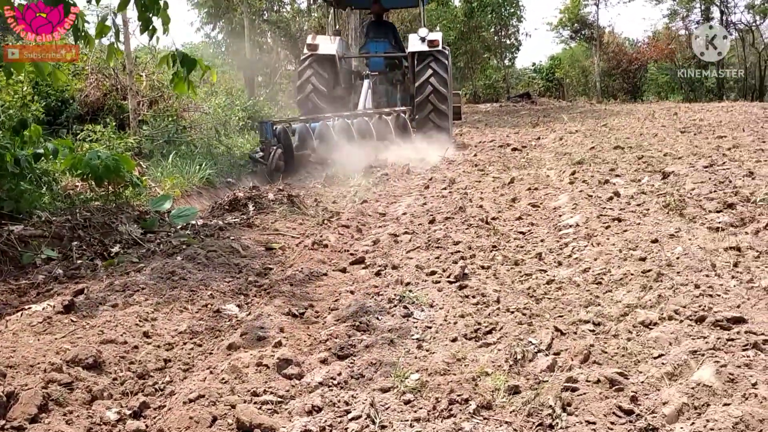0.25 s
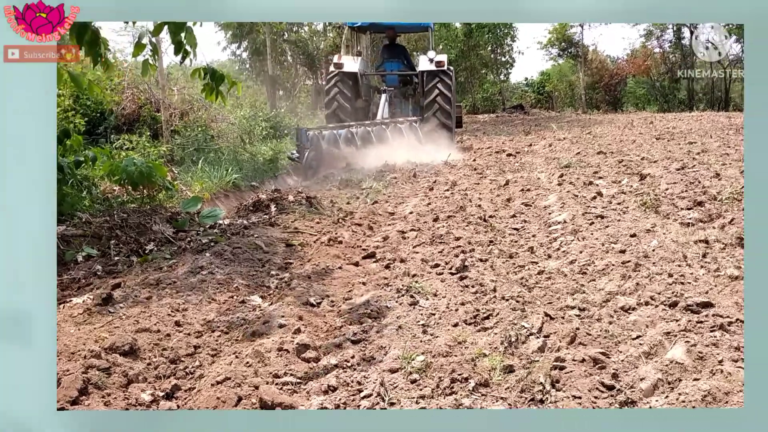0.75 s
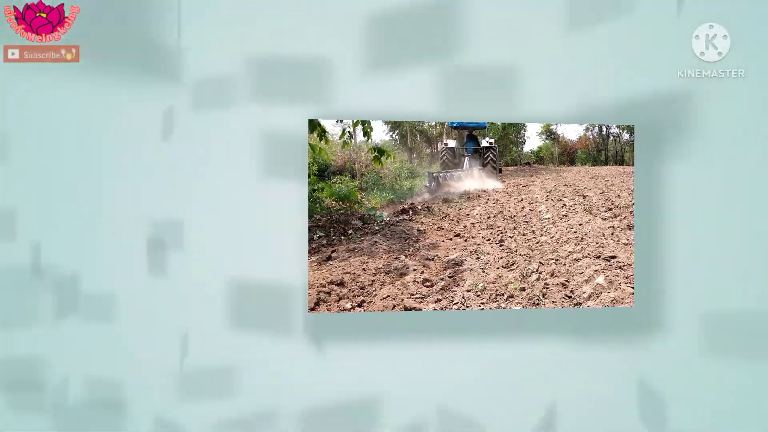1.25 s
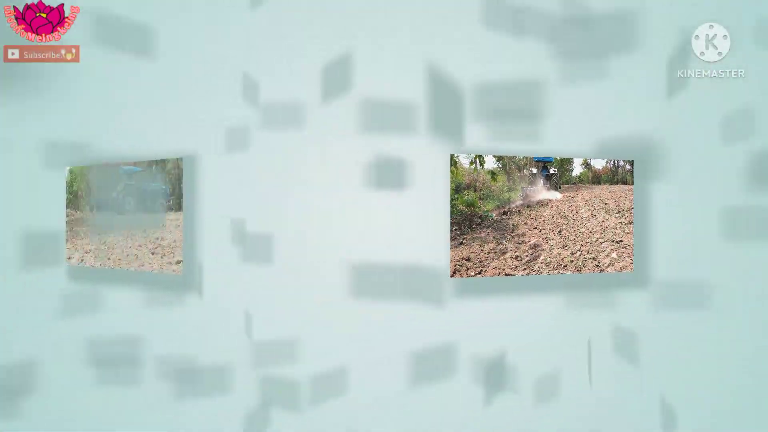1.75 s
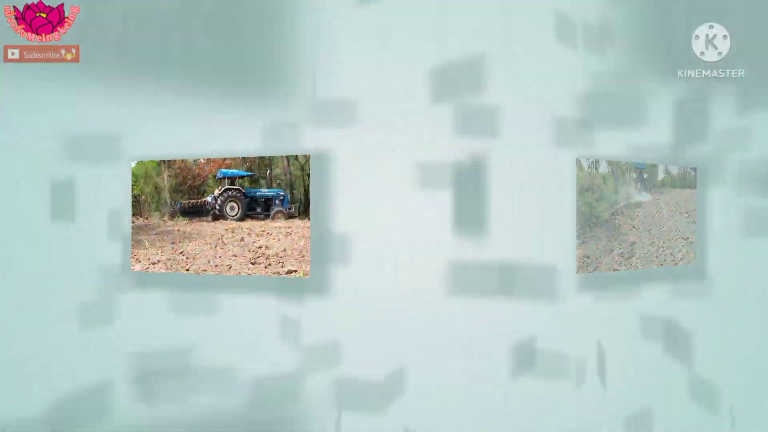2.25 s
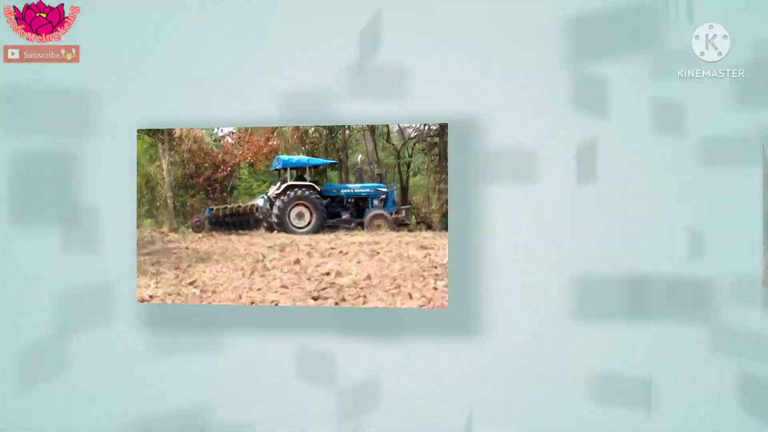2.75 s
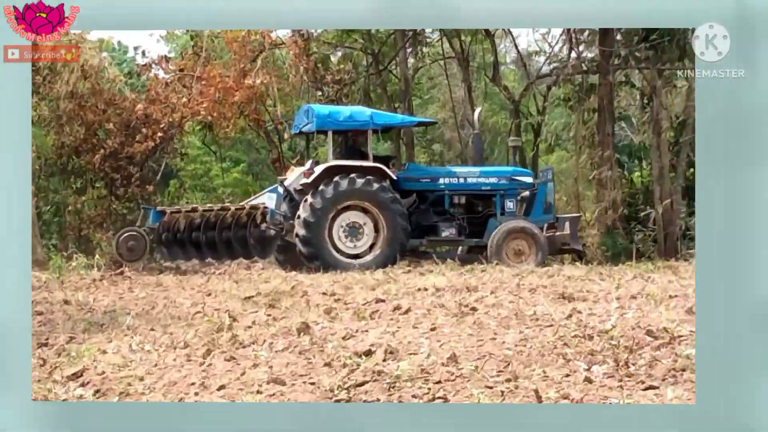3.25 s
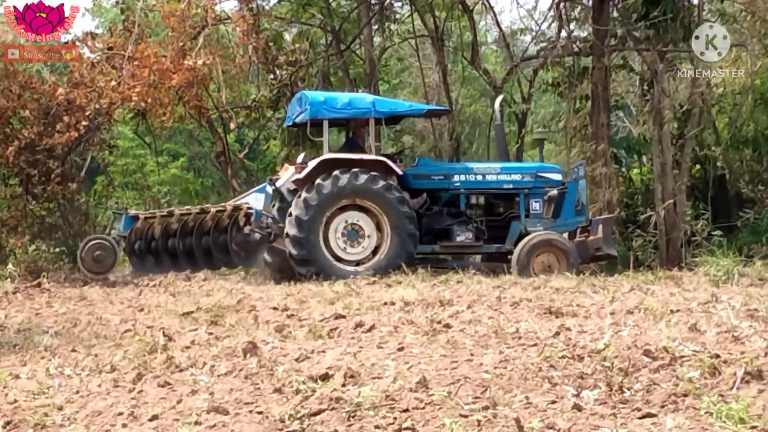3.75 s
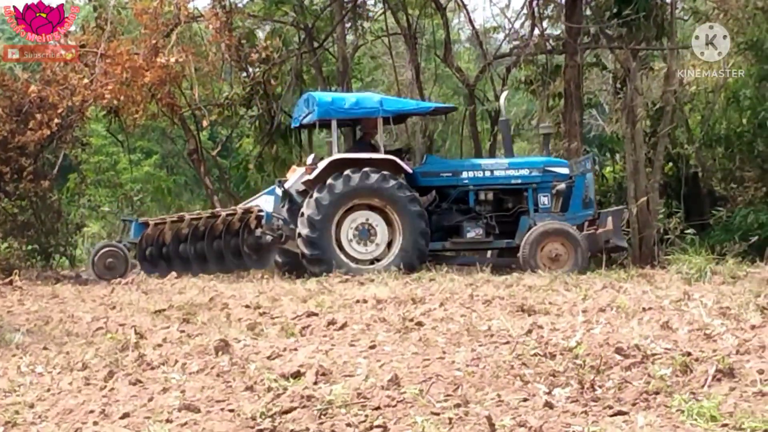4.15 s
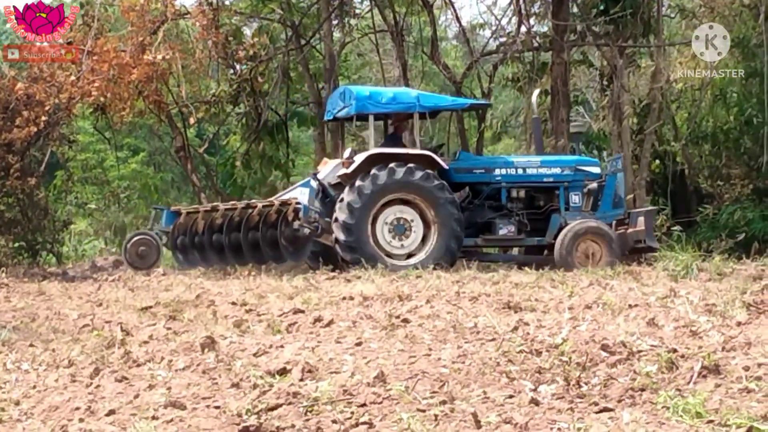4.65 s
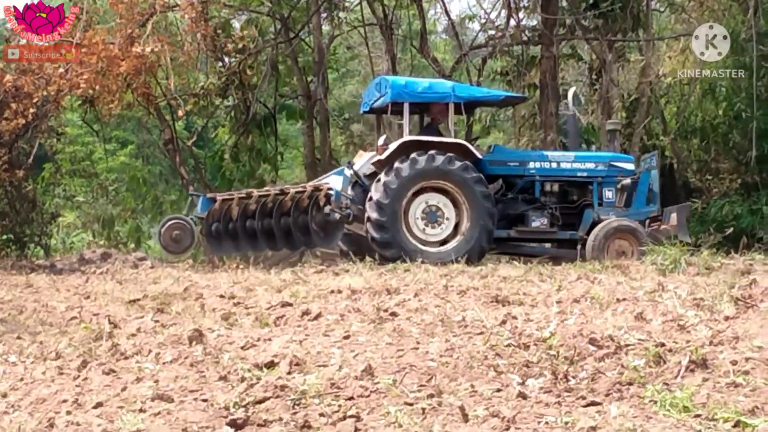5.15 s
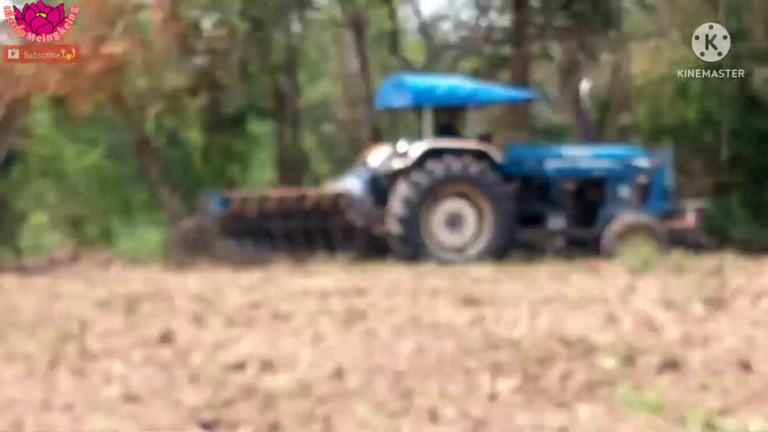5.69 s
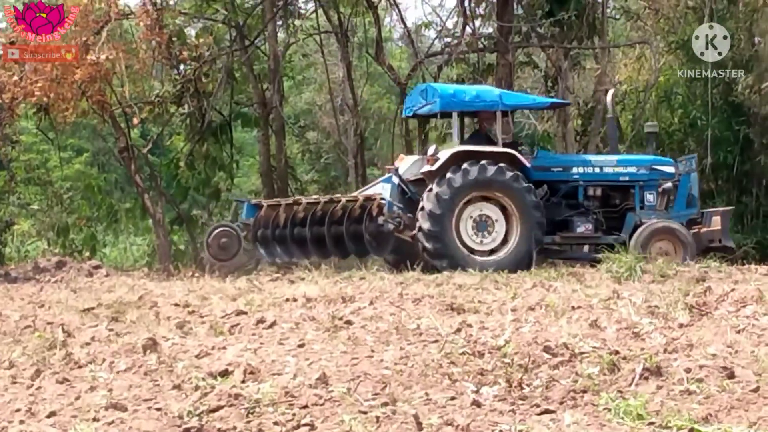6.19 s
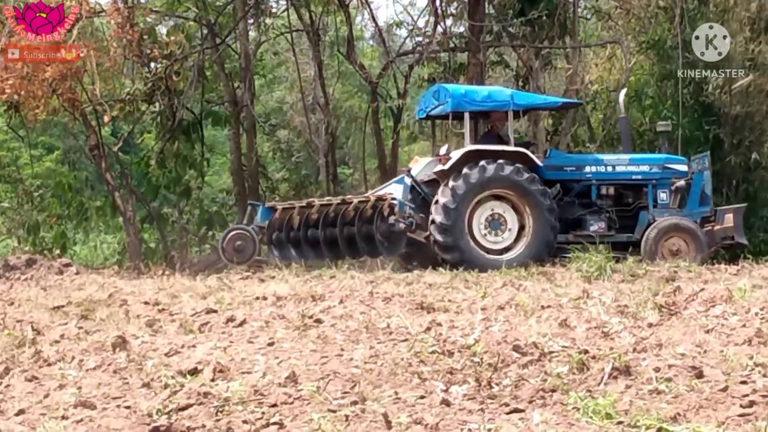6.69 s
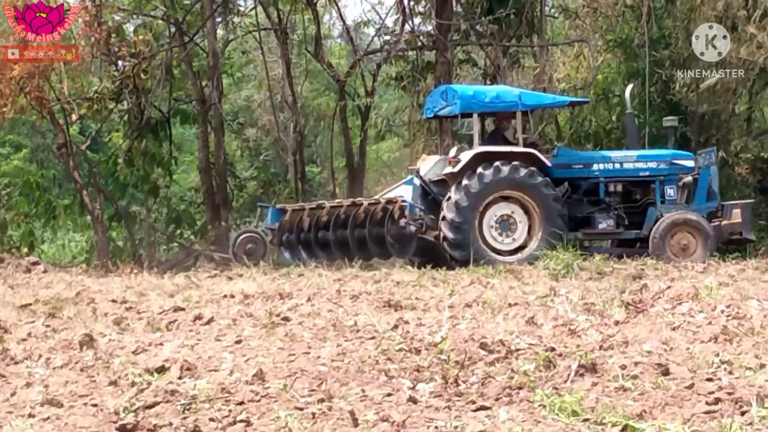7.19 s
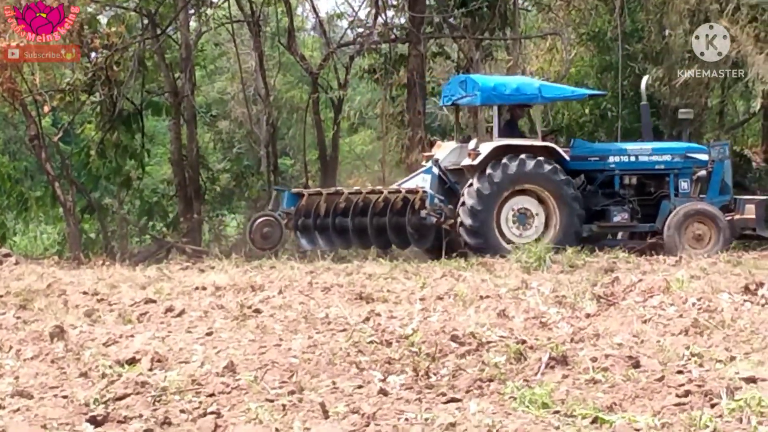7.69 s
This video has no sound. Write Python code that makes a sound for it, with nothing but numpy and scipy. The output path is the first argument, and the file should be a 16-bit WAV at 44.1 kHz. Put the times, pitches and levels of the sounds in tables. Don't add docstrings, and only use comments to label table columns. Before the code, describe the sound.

Outdoors in a field, a diesel tractor drones fast and loud near the microphone, soil hissing and stones cracking against ringing steel discs. Over about three seconds it recedes and cross-fades into a much quieter, farther pass, with slower uneven firing, ticking valves and small metal clanks. Near the end, soft wind gusts and low slaps press on the microphone.

```python
import sys
import numpy as np
from scipy import signal
from scipy.fft import rfft, irfft, next_fast_len
from scipy.io import wavfile

SR = 44100
rng = np.random.default_rng(int(sys.argv[2]) if len(sys.argv) > 2 else 0)


def wrap_up_sound(samples):
    columns = np.atleast_2d(samples).T
    tamed = np.clip(columns, -1, 1)
    steps = np.round(tamed * 32767).astype(np.int16)
    wavfile.write(sys.argv[1], SR, steps)


def decibels_to_gain(level_db):
    exponent = np.asarray(level_db, float) / 20
    return 10 ** exponent


N = 349713

# t/s, length/s, level/dB
GUSTS = [
    (4.85, .2, -56),
    (7.15, .35, -53),
    (7.5, .6, -53),
]
# t/s, peak level/dB, f/Hz
THUMPS = [
    (7.258, -43.5, 30),
    (7.325, -32, 38),
    (7.428, -42, 34),
    (7.634, -31, 41.6),
    (7.745, -42, 48),
    (7.81, -42, 36),
    (7.888, -33, 45),
]
# t/s, level/dB
NEAR_FADE_DB = [
    (0, 1),
    (.55, 0),
    (1.0, -1.5),
    (1.5, -4.5),
    (2.0, -9.5),
    (2.35, -12),
    (2.75, -17.5),
    (3.05, -22.5),
    (3.4, -29.5),
]
# t/s, f/Hz
NEAR_FIRING_HZ = [(0.0, 45.24), (0.4, 45.15), (0.95, 44.15), (1.5, 44.48), (2.0, 44.76), (2.4, 44.36),
                  (2.75, 43.77), (3.0, 43.64)]
FAR_FIRING_HZ = [(1.7, 29.46), (2.62, 32.16), (2.9, 31.62), (3.15, 28.61), (3.56, 28.23), (3.84, 29.16),
                 (4.15, 28.61), (4.46, 31.3), (4.73, 28.31), (4.96, 29.48), (5.19, 27.37), (5.55, 29.75),
                 (5.77, 28.5), (6.11, 29.73), (6.43, 27.53), (7.0, 29.09), (7.24, 29.11), (7.93, 26.95)]
# t/s, level/dB
LOAD_DB = [(2.55, 5), (2.68, -6), (2.92, -1.5), (3.03, -2), (3.4, -2), (3.8, -0.5), (4.11, -3.5), (4.5, -1),
           (4.93, 0), (5.16, -8.5), (5.29, 0), (5.6, 0), (6.0, -1.5), (6.49, -3.5), (6.78, -2),
           (7.09, -3.5), (7.42, -1), (7.62, -1), (7.93, 3)]
# t/s, level/dB
HARSH_DB = [(3.0, -0.5), (3.35, -3.5), (3.7, -1.5), (4.1, -2.5), (4.6, 1.5), (4.95, 3.5), (5.25, 0.5),
            (5.5, 3), (5.7, 3.5), (6.05, 2.5), (6.45, -1.5), (7.1, -1.5), (7.55, 1), (7.93, 2)]
# t/s, level/dB
DRONE_TURN_DB = [
    (3.0, 2.5),
    (4.2, 0.5),
    (5.4, 2.5),
    (5.7, -4),
    (6.2, 2),
    (7.0, 0),
    (7.6, -1),
    (7.93, 1),
]
# t/s, level/dB
SIDE_PANEL_DB = [
    (6.3, -81),
    (6.7, -61.5),
    (7.0, -58),
    (7.5, -64),
    (7.93, -60),
]
# multiple of firing rate, level/dB
NEAR_ORDERS = [(.75, -26), (1, -5), (1.25, -19), (1.75, -28), (2, -9), (2.25, -19), (2.5, -30), (2.75, -29),
               (3, -31), (3.25, -26), (3.5, -26), (3.75, -30), (4, -18), (5, -29), (6, -31), (7, -32),
               (9, -31)]
FAR_ORDERS = [(.25, -27), (1, -14), (1.5, -19), (1.75, -26), (2, -5), (2.25, -25), (2.5, -27), (3, -7),
              (3.25, -29), (4, -15), (5, -27)]
# f/Hz, density level/dB
NEAR_NOISE = [(82, -25), (140, 10.5), (181, 2.5), (360, -11.5), (555, -6), (662, -10.5), (907, -1),
              (1150, -5.5), (1990, -2.5), (2890, -4.5), (3660, -14), (5990, -20.5), (15400, -20.5)]
FAR_NOISE = [(88, 3), (150, 4.5), (263, -6.5), (480, -11.5), (529, -4.5), (721, -7), (1020, -0.5),
             (1390, -5), (1720, -8.5), (2440, -4.5), (5000, -14.5), (7820, -15.5), (15400, -17)]
# f/Hz, width/Hz, boost level/dB
NEAR_BODY = [(155, 70, -9), (401, 30, 4), (560, 60, 4), (813, 25, 4), (926, 25, 7), (1039, 70, 3),
             (1221, 25, 4), (1464, 50, 4), (1804, 35, 4), (1983, 130, 3), (2550, 150, 2), (2885, 50, 3),
             (3240, 50, 5), (3983, 40, 3), (4320, 190, 2), (4690, 80, 3), (8410, 600, 3), (15300, 1500, 4)]
FAR_BODY = [(222, 65, -10), (540, 64, 0.5), (1060, 54, 3.5), (1410, 26, 9.5), (2190, 410, 4),
            (4650, 450, 7.5), (8150, 2400, 10), (15000, 1500, 4.5)]
# f/Hz, share/0-1
NEAR_BEAT = [(300, 0.05), (560, 0.23), (950, 0.35), (2000, 0), (4000, 0.09), (15000, 0)]
FAR_BEAT = [(300, .03), (600, .06), (1000, .26), (2500, .4), (6000, .27), (15000, .3)]
NEAR_CYLINDER_DB = [-4.5, -3, -2, -1]
FAR_CYLINDER_DB = [2.7, 3.2, 2.5, 1.1]
# f/Hz, level/dB, t60/s
NEAR_BLOCK = [(594, -12.5, 0.047), (815, -12, 0.18), (927, 2.5, 0.096), (984, 6.5, 0.089),
              (1104, -17, 0.11), (1495, -2, 0.27), (1830, -2, 0.051), (2050, -5, 0.12), (2496, -24, 0.061),
              (2940, 2, 0.019), (3380, -16, 0.04)]
FAR_BLOCK = [(1014, -5, 0.18), (1082, -4, 0.29), (1335, -11, 0.068), (1517, -3, 0.12), (1973, 6.5, 0.073),
             (2160, 3, 0.088), (2377, 5, 0.072), (2520, -4, 0.076), (3070, 2, 0.093), (3270, -1, 0.06),
             (4660, -25, .04), (5600, -3, .03), (7930, -24, .035), (8440, -25, 0.031), (9930, -9, .03),
             (11400, -22, .03)]
NEAR_DB = [-32, -41.5, -35.5, -41.5]
FAR_DB = [-42.5, -65.5, -54, -65]
NEAR_FOLLOWS_FADE = [0.98, 0.99, 0.95, 0.95]
FOLLOWS_LOAD = [.99, 0.12, 0.16, 0.044]
FOLLOWS_HARSH = [.01, .2, .4, .7]
# t/s, peak level/dB, loudest ring f/Hz, brightness level/dB
STONES = [(0.12, -18, 1770, -23), (0.3398, -26, 1740, -11), (0.6055, -21, 2030, -14),
          (0.674, -26, 2860, -18), (0.722, -23, 2820, -8.5), (0.732, -22.5, 2270, -7),
          (0.7667, -29, 1920, -22), (0.78, -15, 1930, -28), (0.846, -23, 2020, -25),
          (0.878, -21.5, 2033, -26), (0.981, -24, 2900, -8), (1.0057, -24, 3270, -10),
          (1.053, -30, 1830, -21), (1.306, -27, 1830, -21), (1.8304, -25, 2320, -13),
          (1.838, -26, 1840, -23), (1.851, -29, 2950, -22), (1.862, -33, 2260, -20),
          (2.156, -32, 1935, -14), (2.23, -32.5, 2490, -9), (2.366, -26.5, 3130, -5),
          (2.432, -40, 1510, -4), (2.463, -31.5, 1910, -16), (2.533, -41, 2900, -6),
          (2.788, -37, 1890, -28)]
# f/Hz, level/dB, t60/s
DISC_MODES = [(1820, 2, 0.059), (2590, 4.5, 0.03), (3220, 1, 0.034), (5250, -9, 0.05), (6000, -28, 0.025),
              (8400, -8.5, 0.053), (10000, -14, 0.044), (12400, -18, .035), (15000, -17, .03)]
# t/s, peak level/dB
JINGLES = [
    (2.9876, -59),
    (3.1168, -56),
    (3.7347, -61),
    (3.7584, -64),
]
# f/Hz, level/dB, t60/s
LINK_MODES = [(8050, -1.5, 0.19), (10840, -1, 0.054)]
TICK_CYLINDER_DB = [2, -6, -14, -23]
TICK_RING_HZ = [8300, 4700, 5670, 4750]
TICK_RING_DB = [-19.5, -32, -14, -17]
# t/s, peak level/dB, top octave level/dB,
# ring f/Hz
SNAPS = [(2.153, -44, 2, 8300), (2.428, -45, -6, 4700), (2.461, -46, 1, 8400), (2.53, -44, -4, 8400),
         (2.574, -49, -4, 8400), (0.338, -30, 1, 8400), (2.294, -37, -14, 4200), (2.318, -37, -16, 4200),
         (2.19, -45, -16, 7600), (6.7753, -43, -12, 11200), (7.078, -55, -14, 8900),
         (7.141, -50, -14, 10800), (7.392, -54, -6, 8400), (7.53, -53, -7, 8300), (7.672, -50.5, -10, 8500),
         (7.848, -47, -12, 8600), (7.915, -56, -10, 8000)]
# t/s, peak level/dB, top octave level/dB, ring f/Hz
HARD_TICKS = [(3.6166, -50, -18, 8440), (3.654, -51, -22, 4520), (3.7247, -53, -16, 4500),
              (3.7583, -52, -17, 8090), (4.0347, -52, -16, 8170), (4.1733, -52.5, -16, 5960),
              (4.307, -49, -18, 6760), (4.4367, -50.5, -15, 5850), (4.567, -47, -14, 8150),
              (4.6014, -53, -15, 4090), (4.7051, -58, -15, 6500), (4.74, -54, -8, 8450),
              (4.8443, -50, -16, 7830), (4.8792, -48, -15, 11400), (4.9175, -53, -7, 4590),
              (4.9491, -48, -12, 4570), (4.9824, -46, -10, 7060), (5.0149, -48, -7, 4540),
              (5.0514, -53, -11, 4580), (5.1222, -49, -11, 6160), (5.1581, -53, -5, 4220),
              (5.266, -46, -14, 7880), (5.3806, -43.5, -16, 10960), (5.5422, -54, -16, 7910),
              (5.5767, -49, -14, 4740), (5.6161, -48, -12, 8100), (5.6799, -47, -17, 4030),
              (5.7143, -50, -9, 4600), (5.7543, -51, -12, 4550), (5.8186, -56, -31, 4760),
              (5.8535, -50, -13, 4570), (5.8879, -53, -4, 4620), (5.9214, -53, -6, 4670),
              (5.9573, -53, -18, 4050), (5.9912, -52, -16, 4050), (6.0291, -50, -12, 4300),
              (6.0631, -55, -11, 4100), (6.0935, -48, -15, 4500), (6.2297, -50, -10, 4260),
              (6.5155, -50, -9, 6000), (6.8044, -52, -19, 4010), (6.9066, -52, -19, 8960),
              (7.2154, -57, -17, 8440), (7.353, -52, -17, 8430), (7.4928, -50, -20, 8440),
              (7.637, -48, -17, 8440), (7.709, -49, -15, 7950), (7.781, -45, -22, 8080)]
# t/s, peak level/dB, ring f/Hz
NEAR_KNOCKS = [(0.051, -31, 940), (0.081, -32, 930), (0.144, -29, 950), (0.189, -25.5, 950),
               (0.23, -24.5, 915), (0.254, -26, 870), (0.278, -27.5, 1070), (0.297, -35, 1030),
               (0.318, -37, 840), (0.34, -30, 950), (0.365, -23.5, 963), (0.453, -27, 930),
               (0.474, -24, 1016), (0.495, -29, 920), (0.616, -28, 1067), (0.653, -23, 1010),
               (0.742, -31, 980), (0.779, -26, 921), (0.812, -25, 940), (0.833, -22, 1000),
               (0.902, -38, 1000), (0.923, -38, 991), (0.969, -24.5, 916), (1.017, -37, 1030),
               (1.037, -33, 1065), (1.095, -37, 1040), (1.128, -31.5, 1030), (1.164, -43, 940),
               (1.194, -33, 950), (1.218, -32, 1000), (1.285, -29, 1070), (1.374, -37, 1010),
               (1.465, -29.5, 993), (1.536, -36, 1020), (1.554, -32, 950), (1.734, -35, 1020),
               (1.824, -36, 1070), (1.846, -31, 930), (1.895, -39, 940), (1.914, -36, 990),
               (2.093, -36, 936), (2.161, -33, 918), (2.182, -40, 1020), (2.454, -35, 930),
               (2.634, -42, 900)]
# t/s, peak level/dB, ring f/Hz
FAR_CLANKS = [(3.0612, -44, 2150), (3.3376, -47, 2220), (3.4792, -47, 2370), (3.6204, -52, 1090),
              (3.7601, -40, 2390), (4.104, -47, 2160), (4.2046, -44, 1030), (4.3067, -41, 2210),
              (4.409, -43, 1030), (4.4396, -37.5, 2150), (4.5678, -40, 1090), (4.6381, -43, 1040),
              (4.7079, -37, 2170), (4.847, -43, 990), (4.8806, -37, 1065), (4.9495, -44, 2480),
              (5.338, -35, 1060), (5.3734, -36, 2060), (5.411, -38, 2060), (5.5116, -41, 2370),
              (5.5416, -47, 2410), (5.58, -45, 1010), (5.613, -47, 1410), (5.6815, -37, 2380),
              (5.8908, -49, 1060), (6.0279, -45, 2330), (6.1285, -50, 982), (6.232, -48, 2370),
              (6.4846, -44, 1130), (6.589, -45, 1100), (6.7315, -35, 1350), (6.8007, -41, 2450),
              (6.87, -42, 1200), (6.9419, -46, 1560), (6.976, -42, 1330), (7.0084, -41, 1370),
              (7.046, -38, 1340), (7.0786, -36, 2290), (7.118, -43, 1290), (7.1496, -36, 1340),
              (7.2098, -37, 1940), (7.2512, -48, 2140), (7.2841, -45, 1360), (7.316, -36, 2240),
              (7.3546, -43, 1040), (7.4238, -39, 1390), (7.4562, -42, 1150), (7.528, -43, 1015),
              (7.563, -34.5, 1380), (7.5989, -43, 1350), (7.6378, -38, 2500), (7.6737, -40, 977),
              (7.7091, -36, 1390), (7.7855, -35, 2450), (7.889, -38, 2150)]
# t/s, peak level/dB, ring f/Hz
BUMPS = [
    (7.80, -56, 640),
    (7.83, -56, 540),
    (7.86, -58, 640),
    (7.89, -58, 560),
]


def rms_one(x):
    return x / np.sqrt(np.mean(x ** 2) + 1e-20)


def in_time(rows):
    s, *columns = np.transpose(rows)
    return [np.interp(np.arange(N) / SR, s, c) for c in columns]


def at_hz(points, hz):
    table = np.array(points)
    return np.interp(np.log(hz), np.log(table[:, 0]), table[:, 1])


def drift(rate_hz):
    r = np.exp(-80 * np.pi * rate_hz / SR)
    white = rng.standard_normal(N // 40 + 2002)
    slow = signal.lfilter([1], [1, -2 * r, r * r], white)[2000:]
    return np.interp(np.arange(N) / 40, np.arange(len(slow)), rms_one(slow))


def ring(clicks, hz, t60):
    r, w = decibels_to_gain(-60 / (t60 * SR)), 2 * np.pi * hz / SR
    return signal.lfilter([0, np.sin(w)], [1, -2 * r * np.cos(w), r * r], clicks + 1e-18)


def band(x, low_hz, high_hz):
    return signal.sosfilt(signal.butter(2, [low_hz, high_hz], "band", fs=SR, output="sos"), x)


def clicks_at(times_s, sizes):
    out = np.zeros(N)
    out[np.round(np.asarray(times_s) * SR).astype(int)] = sizes
    return out


def wind(fade_db):
    breeze_db, near_db, follows_fade = -69, -53, 2.1
    rise_s, fall_s = 0.091, 0.23
    air = band(band(rng.standard_normal(N), 12, 95), 12, 95)
    t = np.arange(N) / SR
    level = decibels_to_gain(breeze_db) + decibels_to_gain(near_db + follows_fade * fade_db)
    for s, length_s, db in GUSTS:
        corners_s = s + np.array([0, rise_s, length_s, length_s + fall_s])
        level = level + decibels_to_gain(db) * np.interp(t, corners_s, [0, 1, 1, 0])
    return level * decibels_to_gain(4.6 * drift(7.4)) * rms_one(air)


def thumps():
    out, since = np.zeros(N + SR), np.arange(6000) / SR
    envelope = (1 - np.exp(-since / 0.008)) * np.exp(-since / 0.02)
    for s, db, hz in THUMPS:
        i = round(s * SR)
        out[i:i + 6000] -= decibels_to_gain(db - 1.0) * envelope * np.sin(2 * np.pi * hz * since)
    return out[:N]


def link():
    s, peak_db = np.transpose(JINGLES)
    return sum(ring(clicks_at(s, decibels_to_gain(peak_db + db + 2.5)), hz, t60) for hz, db, t60 in LINK_MODES)


def side_panel(gate):
    shaken = rng.standard_normal(N) * (1.8 + rms_one(gate))
    return decibels_to_gain(in_time(SIDE_PANEL_DB)[0]) * rms_one(band(shaken, 1230, 1590))


def rattle(per_s, low_hz, high_hz, t60):
    sizes = decibels_to_gain(3 * np.minimum(rng.exponential(1, N), 3.5))
    sizes = sizes * (rng.random(N) < per_s / SR)
    dealt = rng.integers(0, 28, N)
    pitches_hz = np.geomspace(low_hz, high_hz, 28) * rng.uniform(0.97, 1.03, 28)
    return rms_one(sum(ring(sizes * (dealt == k), hz, t60) for k, hz in enumerate(pitches_hz)))


def clanks(rows, gain_db, shake_s, t60, spread):
    out, since = np.zeros(N + SR), np.arange(2600) / SR
    for (s, db, hz), noise in zip(rows, rng.standard_normal((60, 2600))):
        shake = noise * since * np.exp(-since / shake_s)
        blow = ring(shake, hz, t60)
        blow = blow + 0.3 * ring(shake, hz * (1 - spread), t60)
        blow = blow + 0.39 * ring(shake, hz * (1 + spread), t60)
        i = round(s * SR)
        out[i:i + 2600] += decibels_to_gain(db + gain_db) * blow / np.abs(blow).max()
    return out[:N]


def stones():
    out, white = np.zeros(N), rng.standard_normal(N)
    s, peak_db, _, bright_db = np.transpose(STONES)
    uneven_db = rng.normal(0, 1.9, (len(s), len(DISC_MODES)))
    late_s = rng.uniform(.002, .008, (len(s), len(DISC_MODES)))
    for k, (hz, db, t60) in enumerate(DISC_MODES):
        strike_db = peak_db + db - 16.0 + uneven_db[:, k] + (bright_db + 13) * (hz > 5000)
        out += ring(clicks_at(s + late_s[:, k], decibels_to_gain(strike_db)), hz, t60)
    blow_s = 0.025
    since = np.arange(6000) / SR
    for at, db, hz, bright in STONES:
        i = round((at + .002) * SR)
        grit = white[i:i + 6000]
        spray = grit * (1 - np.exp(-since / 0.0026)) * np.exp(-since * np.log(1000) / (3 * blow_s))
        crack = grit * np.exp(-since / .0015)
        note = (1 - np.exp(-since / 0.00081)) * ring(since == 0, hz, 3.05 * blow_s)
        snap = spray * np.exp(-since / 0.015) + 0.44 * crack
        blow = decibels_to_gain(db - 8.5) * note + decibels_to_gain(db) * band(spray, hz / 1.15, hz * 1.35)
        blow += decibels_to_gain(db + bright + 3.0) * band(snap, 3940, 10100)
        blow += decibels_to_gain(db - 12 + 0.55 * bright) * band(spray, 10000, 15900)
        out[i:i + 6000] += blow
    return out


def firings(firing_hz, first_s):
    count = np.cumsum(in_time(firing_hz)[0]) / SR
    return count - count[int(first_s * SR)]


def valve_ticks(count, present, harsh_db):
    late = -0.022
    which = np.floor(count - late).astype(int)
    at = np.flatnonzero(np.diff(which)) + 1
    cylinder, chance = which[at] % 4, rng.standard_normal((400, 4))[:len(at)]
    fade_db = 20 * np.log10(present[at] + 1e-4)
    cylinder_db = np.array(TICK_CYLINDER_DB)[cylinder]
    peak_db = -51 + cylinder_db + 3.5 * harsh_db[at] + 4 * chance[:, 0] + fade_db
    top_db = -61.5 + .4 * cylinder_db + 3.3 * harsh_db[at] + 2.8 * chance[:, 1] + fade_db
    ring_hz = np.array(TICK_RING_HZ)[cylinder] * (1 + 0.02 * chance[:, 2])
    ring_db = np.array(TICK_RING_DB)[cylinder] + 2.0 * chance[:, 3]
    return np.transpose([at / SR, peak_db, top_db - peak_db, ring_hz, ring_db])


def ticks(rows):
    s, peak_db, top_db, ring_hz, ring_db = np.transpose(rows)
    out, white = np.zeros(N + SR), rng.standard_normal(N)
    for low_hz, high_hz, db, fall_s in [(1500, 3100, peak_db - 7.5, 0.018),
                                        (3500, 10400, peak_db - 11.5, 0.015),
                                        (9900, 12100, peak_db + top_db - 5, 0.011),
                                        (13400, 21000, peak_db + top_db + 9.5, 0.0073)]:
        scatter_db = 0.85 * rng.standard_normal(400)[:len(s)]
        puffs = clicks_at(s, decibels_to_gain(db + scatter_db)) + 1e-18
        swell, fall = np.exp(-1 / (0.0055 * SR)), np.exp(-1 / (fall_s * SR))
        puffs = signal.lfilter([1], [1, -fall], puffs)
        puffs = signal.lfilter([1 - swell], [1, -swell], puffs)
        out[:N] += band(puffs * white, low_hz, high_hz)
    starts = np.round((s + 0.0025) * SR).astype(int)
    for at, db, hz in zip(starts, peak_db + ring_db, ring_hz):
        pair = sum(ring(np.arange(3000) == 0, hz * k, t60=.04) for k in (.985, 1.01))
        out[at:at + 3000] += decibels_to_gain(db) * pair
    return out[:N]


def knocks(count, late, block, scatter_db):
    at = np.flatnonzero(np.diff(np.floor(count - late)))
    out = np.zeros(N)
    for hz, db, t60 in block:
        delayed_s = np.minimum(at + rng.integers(0, 420, len(at)), N - 1) / SR
        strike_db = db + scatter_db * rng.standard_normal(len(at))
        out += ring(clicks_at(delayed_s, decibels_to_gain(strike_db)), hz, t60)
    return rms_one(out)


def bursts(count, late, rise, decay, cylinder_db, scatter_db):
    which = np.floor(count - late).astype(int)
    since = count - late - which
    chance = rng.standard_normal(400)[which - which[0]]
    strength = decibels_to_gain(np.array(cylinder_db)[which % 4] + scatter_db * chance)
    return strength * (1 - np.exp(-since / rise)) * np.exp(-since / decay)


def engine_noise(gate, spectrum, body, beat, grain_db):
    size = next_fast_len(N)
    hz = np.maximum(np.arange(size // 2 + 1) * SR / size, 1)
    body_db = sum(db / (1 + (2 * (hz - f) / w) ** 2) for f, w, db in body)
    colour = decibels_to_gain(at_hz(spectrum, np.minimum(hz, 15400)) + body_db)
    share = np.clip(at_hz(beat, hz), 0, 1)
    grain = decibels_to_gain(grain_db * (drift(130) + 1.05 * drift(15.3)))
    steady = rms_one(rng.standard_normal(N) * grain)
    beating = rms_one(rng.standard_normal(N) * gate)
    both = colour * (np.sqrt(1 - share) * rfft(steady, size) + np.sqrt(share) * rfft(beating, size))
    over = [1 / (1 + (edge_hz / hz) ** 12) for edge_hz in (135, 700, 4000)] + [0]
    return np.array([rms_one(irfft(both * (over[k] - over[k + 1]), size)[:N]) for k in range(3)])


def exhaust(count, orders, late, even_lag, wander_db, rumble_db):
    tones = 0
    for k, db in orders:
        slow = drift(6)
        turns = k * (count - late) - even_lag * (k % 2 == 0)
        tones = tones - decibels_to_gain(db + wander_db * slow) * np.cos(2 * np.pi * turns + .11 * slow[::-1])
    rumble = band(band(rng.standard_normal(N), 22, 167), 22, 167)
    return rms_one(rms_one(tones) + decibels_to_gain(rumble_db) * rms_one(rumble))


def scene():
    (fade_db,), (load_db,), (harsh_db,) = in_time(NEAR_FADE_DB), in_time(LOAD_DB), in_time(HARSH_DB)
    present, = in_time([(2.02, 0), (3.43, 1)])
    near_levels = decibels_to_gain(np.c_[NEAR_DB] + np.outer(NEAR_FOLLOWS_FADE, fade_db))
    far_db = np.c_[FAR_DB] + np.outer(FOLLOWS_LOAD, load_db) + np.outer(FOLLOWS_HARSH, harsh_db)
    far_db = far_db + np.outer(np.arange(4) == 1, in_time(DRONE_TURN_DB)[0])
    far_levels = present * decibels_to_gain(far_db)
    levels = np.hypot(near_levels, far_levels)
    far_share = (far_levels[2] / levels[2]) ** 2

    near, far = firings(NEAR_FIRING_HZ, first_s=0.), firings(FAR_FIRING_HZ, first_s=5.5425)
    near_gate = bursts(near, late=0.428, rise=0.032, decay=0.23, cylinder_db=NEAR_CYLINDER_DB, scatter_db=3.0)
    far_gate = bursts(far, late=-.03, rise=.08, decay=.28, cylinder_db=FAR_CYLINDER_DB, scatter_db=1.3)
    near_layers = [exhaust(near, NEAR_ORDERS, late=1.63, even_lag=.18, wander_db=1.3, rumble_db=-22),
                   *engine_noise(near_gate, NEAR_NOISE, NEAR_BODY, NEAR_BEAT, grain_db=0.77)]
    far_layers = [exhaust(far, FAR_ORDERS, late=.27, even_lag=.12, wander_db=1.4, rumble_db=-22),
                  *engine_noise(far_gate, FAR_NOISE, FAR_BODY, FAR_BEAT, grain_db=-0.5)]
    tractor = (near_levels * near_layers + far_levels * far_layers).sum(axis=0)

    shaking = 1 - far_share + far_share * rms_one(far_gate) ** 2
    metal = levels[2] * decibels_to_gain(-12.5) * rattle(500. * shaking, 889.5, 3770, t60=0.23)
    metal += levels[3] * decibels_to_gain(-8) * rattle(900. * shaking, 4000, 13500, t60=.022)
    metal += near_levels[2] * decibels_to_gain(-11) * knocks(near, .45, NEAR_BLOCK, scatter_db=4)
    metal += far_levels[2] * decibels_to_gain(-7.5) * knocks(far, 0, FAR_BLOCK, scatter_db=3)

    snaps = [(*row, -13.5) for row in SNAPS]
    hard_ticks = [(s, db - 1, top + 7, hz, -20) for s, db, top, hz in HARD_TICKS]
    hard_rings = [(s, db, hz) for s, db, top, hz in HARD_TICKS]
    clicks = ticks([*valve_ticks(far, present, harsh_db), *snaps, *hard_ticks])
    clicks += clanks(NEAR_KNOCKS, gain_db=-3.5, shake_s=.003, t60=0.08, spread=0.051)
    clicks += clanks(FAR_CLANKS, gain_db=-7.5, shake_s=0.0038, t60=.05, spread=0.123)
    clicks += clanks(hard_rings, gain_db=-2.5, shake_s=0.0024, t60=0.028, spread=0.031)
    clicks += clanks(BUMPS, gain_db=0.1, shake_s=0.0043, t60=0.12, spread=.12)

    mix = tractor + metal + side_panel(far_gate) + stones() + clicks + link() + thumps() + wind(fade_db)
    return mix[None]


def band_limit(x):
    return signal.sosfilt(signal.butter(12, 15650, fs=SR, output="sos"), x)


def record(dry):
    top_cut = signal.ellip(12, .3, 75, 15560, fs=SR, output="sos")
    mix = signal.sosfilt(top_cut, dry)
    return band_limit(mix)


dry = scene()
out = record(dry)
wrap_up_sound(out)
```